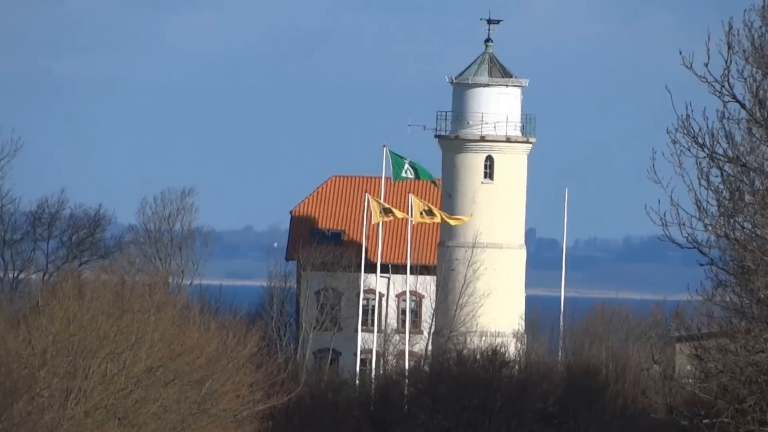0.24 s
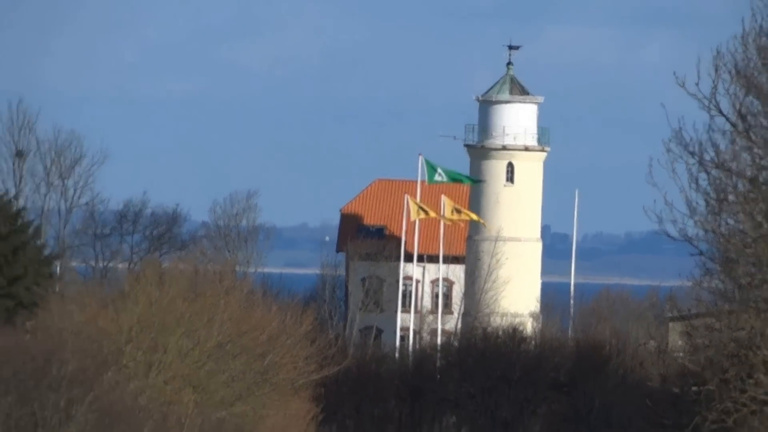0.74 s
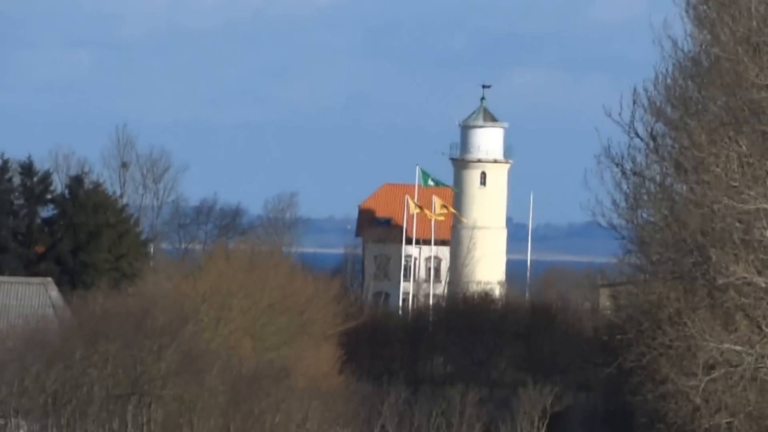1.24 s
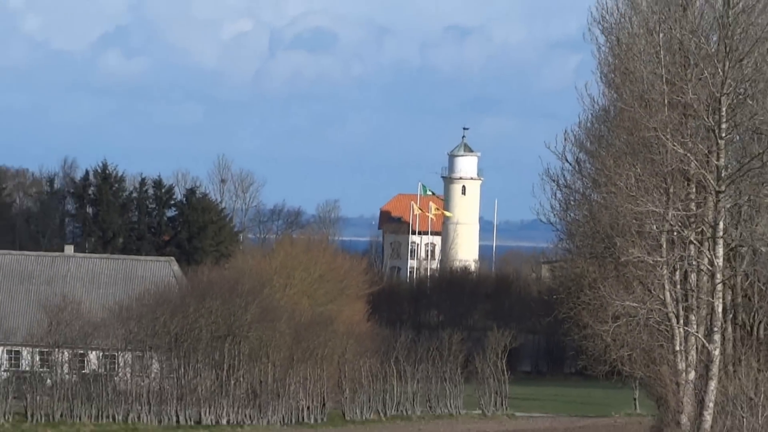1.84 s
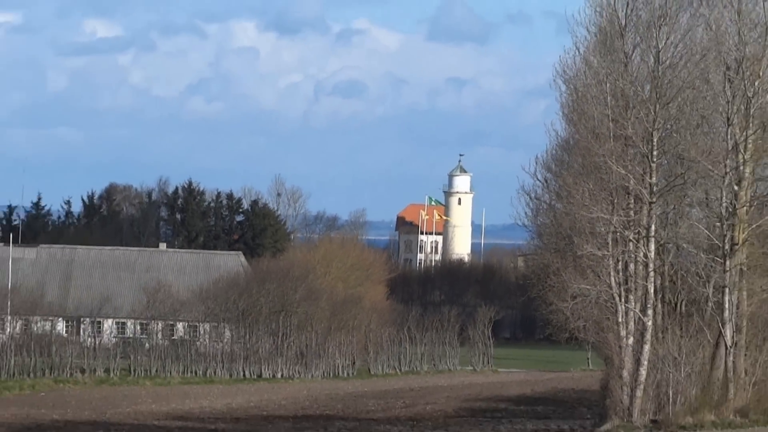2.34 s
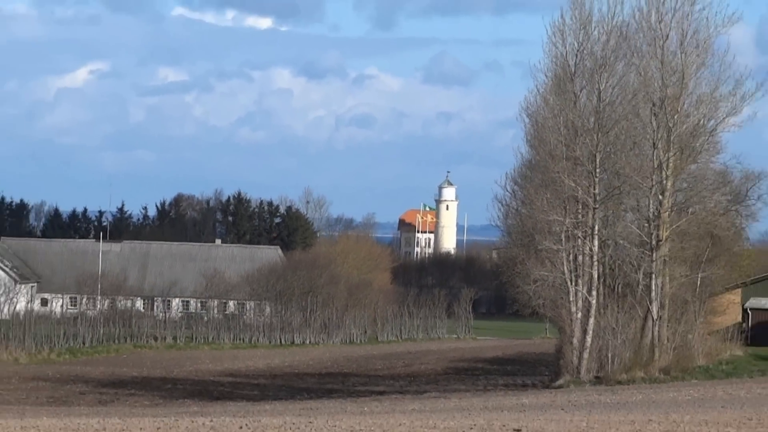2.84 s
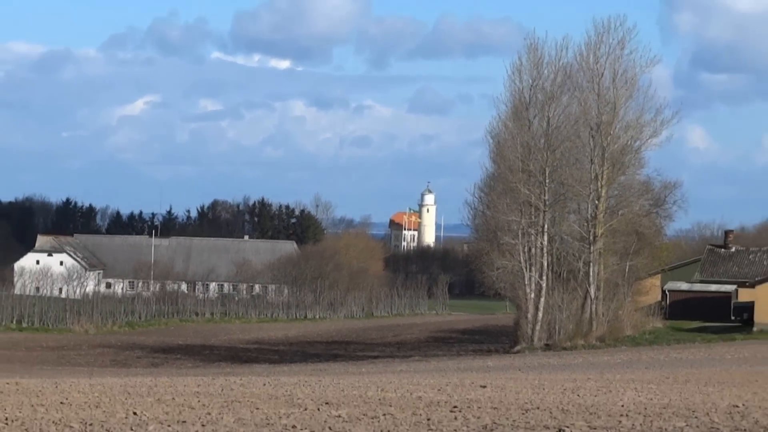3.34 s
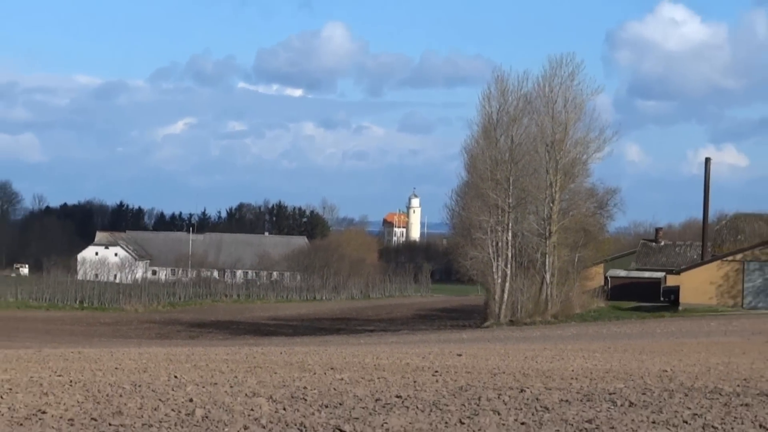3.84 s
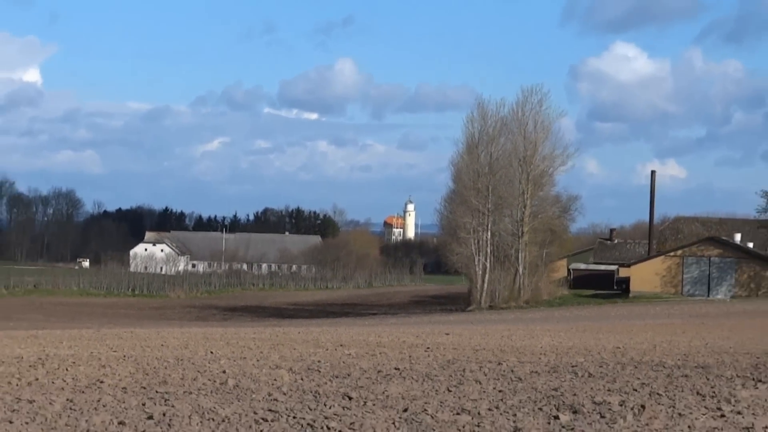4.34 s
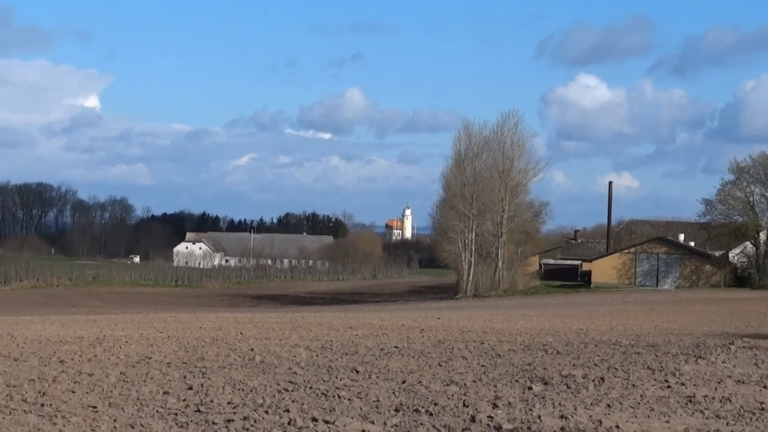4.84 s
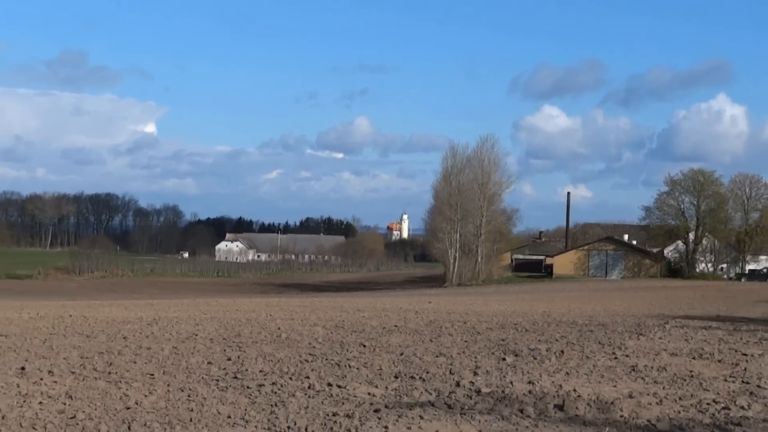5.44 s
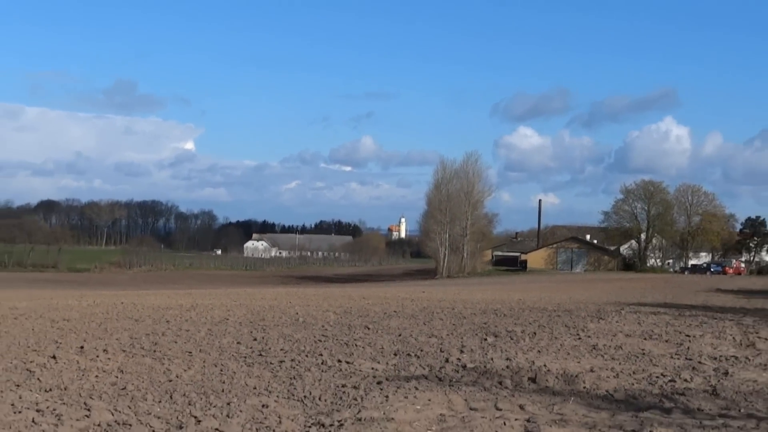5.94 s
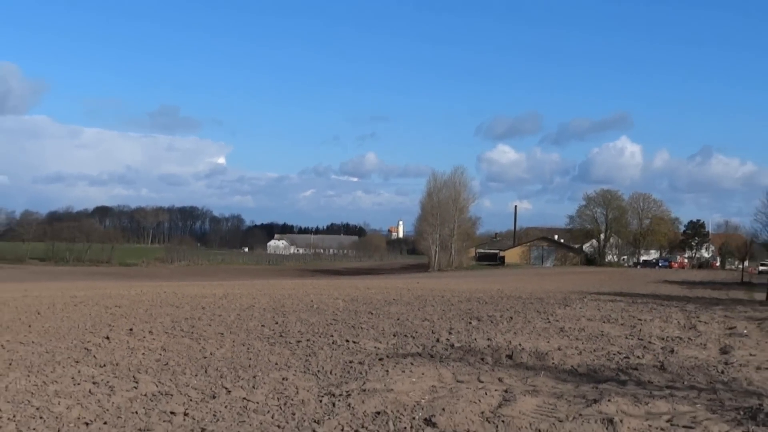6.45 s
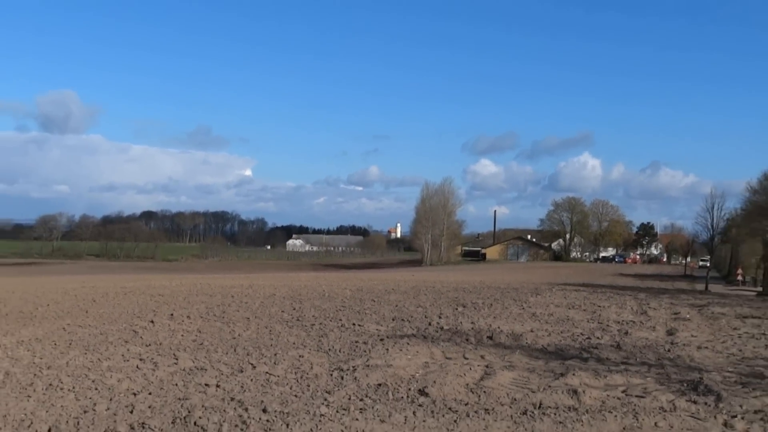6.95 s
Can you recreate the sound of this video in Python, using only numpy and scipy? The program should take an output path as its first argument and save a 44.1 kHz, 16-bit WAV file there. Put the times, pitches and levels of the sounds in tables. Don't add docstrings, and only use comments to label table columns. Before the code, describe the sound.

A small camera zoom motor clicks on and whirs steadily with a buzzy rattle, swelling then easing, while gusty wind rumbles and thumps the microphone.

```python
import sys
import numpy as np
from scipy import signal
from scipy.fft import rfft, irfft, next_fast_len
from scipy.io import wavfile
from scipy.ndimage import map_coordinates

SR = 44100
rng = np.random.default_rng(int(sys.argv[2]) if len(sys.argv) > 2 else 0)


def log_audio(samples):
    frames = np.atleast_2d(samples).T
    limited = np.clip(frames, -1, 1)
    pcm = np.round(limited * 32767).astype(np.int16)
    wavfile.write(sys.argv[1], SR, pcm)


def level_to_linear(level):
    exponent = np.asarray(level, float) / 20
    return 10 ** exponent


N = 317520
T = np.arange(N) / SR

# start_s (middle of the thump), peak_db, pitch_hz, length_cycles
EDDIES = [(0.017, -9, 215, 0.72), (0.031, -11, 181, 1.2), (0.106, -11, 151, 0.69), (0.14, -12.5, 181, 1.05),
          (0.161, -13, 182, .87), (0.314, -17, 136, 2.4), (0.388, -17, 167, .88), (0.448, -14, 186, 0.93),
          (0.509, -14, 146, 1.3), (0.582, -13.5, 203, 0.89), (1.044, -16, 138, 1), (1.059, -9.5, 179, 0.73),
          (1.154, -14.5, 168, 1.35), (1.404, -12, 190, 1.3), (1.778, -15, 165, .8),
          (1.789, -15, 67.4, 0.68), (1.916, -24, 93.5, 1.6), (1.969, -9.5, 144, 0.89),
          (1.988, -13.5, 118, 1.1), (3.307, -15, 111, 0.94), (3.383, -16, 164, 1), (5.042, -19, 101, 1.2),
          (5.355, -5.5, 150, 0.48), (5.407, -8, 168, 0.87), (5.649, -13, 156, 1.1), (6.556, -12, 98, 0.87),
          (6.629, -19, 102, 1.4), (6.733, -5.5, 94, 0.68), (6.792, -12, 151, 1.05),
          (6.927, -14.5, 143, 1.5)]


def unit(x):
    return x / np.sqrt(np.mean(x ** 2) + 1e-20)


def along(points, hz):
    f, v = np.transpose(points)
    return np.interp(np.log(hz + 1), np.log(f + 1), v)


def curves(rows):
    s, *columns = np.transpose(rows)
    return [np.interp(T, s, column) for column in columns]


def wobble(rate):
    points = rng.standard_normal(int(N * rate / SR) + 4)
    return map_coordinates(points, [T * rate])


def filtered(x, response):
    m = next_fast_len(N + SR // 4)
    hz = np.fft.rfftfreq(m, 1 / SR)
    return irfft(rfft(x, m) * response(hz), m)[..., :N]


def hiss():
    # pitch_hz, level_db (per Hz)
    hiss_colour = [(2000, -25), (5000, 6.5), (9000, -2), (12000, -6.5), (13500, -4), (14500, -4),
                   (15100, -7)]
    noise = rng.standard_normal((2, N))
    return level_to_linear(-54) * unit(filtered(noise, lambda hz: level_to_linear(along(hiss_colour, hz))))


def gusts():
    # time_s, strength_db
    wind_swell = [(0.0, -21.5), (0.36, -22), (0.8, -28), (1.2, -26), (2.61, -26.5), (2.93, -33),
                  (3.47, -26.5), (3.89, -30), (4.31, -34), (5.17, -33), (5.47, -27.5), (5.73, -32),
                  (6.24, -31), (6.72, -27.5), (7.04, -33), (7.2, -32)]
    stir_db, stir_s = -13.5, 0.017
    power = level_to_linear(curves(wind_swell)[0]) ** 2
    for s, db, *_ in EDDIES:
        first = max(0, round((s - 4 * stir_s) * SR))
        near = slice(first, round((s + 4 * stir_s) * SR))
        power[near] += level_to_linear(db + stir_db) ** 2 * np.exp(-((T[near] - s) / stir_s) ** 2)
    return 10 * np.log10(power)


def wind():
    # pitch_hz, level_db (per Hz)
    rumble_colour = [(12, -41), (20, -13.5), (59, -0.5), (86, 1), (167, -3), (320, -16), (420, -27.5),
                     (700, -120)]
    # pitch_hz, level_db (per Hz)
    flutter_colour = [(150, -30), (230, -1), (300, -3), (420, -3), (600, -14), (1200, -22.5), (3000, -66)]
    calm_db, rumble_db = -29, 1.5
    sway_hz, sway_db, sway_grows = 74.6, 1.5, 0.31
    flutter_db, flutter_grows, breeze_db = -40, 0.95, -46.5

    gust_db = gusts() - calm_db
    lumps = level_to_linear(0.95 * wobble(22))
    rumble_noise = filtered(rng.standard_normal((2, N)), lambda hz: level_to_linear(along(rumble_colour, hz)))
    rumble = unit(lumps * rumble_noise)
    sway = filtered(rumble, lambda hz: 1 / (1 + (hz / sway_hz) ** 4))
    flutter_noise = filtered(rng.standard_normal((2, N)), lambda hz: level_to_linear(along(flutter_colour, hz)))
    flutter = unit(lumps * level_to_linear(1.65 * wobble(40)) * flutter_noise)

    low = level_to_linear(gust_db) * (rumble - sway) + level_to_linear(sway_db + sway_grows * gust_db) * sway
    flutter_gain = np.hypot(level_to_linear(flutter_db + flutter_grows * gust_db), level_to_linear(breeze_db))
    return level_to_linear(calm_db + rumble_db) * low + flutter_gain * flutter


def eddies():
    lean_db, lean_scatter_db = 0.3, 2
    out = np.zeros((2, N))
    for s, db, hz, cycles in EDDIES:
        early, lean = rng.standard_normal(2)
        near = slice(max(0, round((s - 0.03) * SR)), round((s + 0.028) * SR))
        lead_s = 0.00059 * early * np.array([[1], [-1]])
        u = (T[near] - s + lead_s) * hz
        pan_db = lean_db + lean_scatter_db * lean
        peak = level_to_linear([[db + pan_db / 2], [db - pan_db / 2]])
        out[:, near] -= peak * np.exp(-(u / cycles) ** 2) * np.cos(2 * np.pi * u)
    return out


def clutch():
    # start_s, level_db, pitch_hz, fade_s (time to fall 60 dB)
    clutch_clicks = [
        (.008, -27, 4480, 0.033),
        (.009, -28.5, 3860, .02),
        (.012, -33, 5320, 0.039),
    ]
    out = np.zeros(N)
    for s, db, hz, fade_s in clutch_clicks:
        t = np.clip(T - s, 0, None)
        tone = np.sin(2 * np.pi * hz * t) * (1 - np.exp(-t / 0.00074))
        out += level_to_linear(db - 60 * t / fade_s) * tone * (1 + 0.89 * wobble(1450))
    return np.array([out, 0.2 * out])


def contacts(pattern, width, scatter_db, share, jitter, knock_db):
    # time_s, ahead_turns
    shaft_drift = [(0.0, -0.043), (0.3, -0.408), (0.9, -0.565), (1.5, -1.07), (2.1, -0.998), (2.7, -1.131),
                   (3.0, -1.403), (3.3, -1.426), (3.6, -1.377), (4.2, -1.064), (4.5, -1.009), (5.4, -0.709),
                   (5.7, -0.745), (6.0, -0.615), (6.9, -0.695), (7.2, -0.662)]
    shaft_hz = 30
    angle = np.maximum.accumulate(shaft_hz * T + curves(shaft_drift)[0])
    turns = np.arange(-1, int(angle[-1]))
    power, knocks = np.zeros(N), np.zeros(N)
    for at, db in pattern:
        chance = rng.standard_normal((len(turns) + 4, 2))
        size = level_to_linear(db + scatter_db * chance[:, 0])
        nearest = np.round(angle - at)
        distance = (angle - at - nearest) / max(width, 0.003)
        power += size[nearest.astype(int) + 1] ** 2 * np.exp(-0.5 * distance ** 2)
        knock_turns = turns + at + jitter * chance[:len(turns), 1]
        when = np.interp(knock_turns, angle, np.arange(N), left=N - 1)
        knocks[when.astype(int)] += size[:len(turns)]
    share = np.clip(share, 0, 1)
    scrape = np.sqrt(1 - share + share * power / power.mean()) * rng.standard_normal((2, N))
    return scrape + np.sqrt(share) * level_to_linear(knock_db) * unit(knocks) * [[1], [0]]


def barrel(drive, modes, restless_db, rate):
    lens_times = [0.498, 1.22, 1.3, 3.3, 4.998, 6.4]
    out, power = 0, 0
    for (hz, width, polarity), levels in modes:
        gain = level_to_linear(np.interp(T, lens_times, levels))
        ring = signal.lfilter(*signal.iirpeak(hz, hz / width, SR), drive)
        unrest = level_to_linear(restless_db * min(1, 250 / width) * wobble(rate))
        out = out + np.sign(polarity) * gain * unrest * ring
        power = power + gain ** 2 * width
    return unit(out / np.sqrt(power))


def motor():
    # time_s, load_db, mesh_db (over the load)
    motor_effort = [(0.0, -36.5, -8), (0.25, -37, -6), (0.6, -34.5, -8), (1.0, -33.5, -6), (1.25, -31, -8),
                    (1.8, -30.5, -8), (2.3, -29, -8), (2.7, -28, -9), (3.0, -26, -7), (3.5, -25.5, -9),
                    (4.2, -29.5, -7), (4.55, -29, -7), (5.0, -29.5, -6.5), (5.7, -30.5, -8), (6.3, -31, -9),
                    (6.58, -30.5, -5), (6.85, -29.5, -10), (7.2, -30, -5.5)]
    # angle_turns, size_db
    pole_angles = [(.07, 0), (.235, 0), (.4, 0), (.57, .5), (.735, -.5), (.9, 0)]
    # angle_turns, size_db
    tooth_angles = [(.055, -3), (.22, -11), (.39, 0), (.55, -10), (.72, -5), (.89, -10)]
    # angle_turns, size_db
    brush_angles = [(.43, 0), (.5, -1), (.95, -1), (.02, -2)]
    # (pitch_hz, width_hz, polarity), level_db at each of six lens positions
    low_rings = [((633.6, 66.5, 1), (-5, -8, -8, -6.5, -7.5, -3)), ((951.5, 90, -1),
                 (-7, -4.5, -5.5, -4, -8, -4.5)), ((1228, 76, 1), (-10.5, -8, -10.5, -7.5, -7.5, -2.5)),
                 ((1392, 66.5, 1), (0, 0, 0, 0, 0, 0)), ((1484.6, 77.5, -1), (-0.5, -3, -3.2, 2, -0.8, 2)),
                 ((1622, 106, -1), (-6, -6, -5.5, -15, -8, -2)), ((1873, 520, 1),
                 (-16, -15, -17, -17.5, -19.5, -23))]
    # (pitch_hz, width_hz, polarity), level_db at each of six lens positions
    middle_rings = [((2380, 300, 1), (-7, -14, -8.5, -13.5, -9.5, -9.5)), ((2770, 104, -1),
                    (-3.5, -5.5, -4.5, -7.5, -2, -3)), ((3266, 300, 1), (-4.5, -3.5, -4.5, -0.5, -2.5, -2)),
                    ((3725, 257, -1), (0, 0, 0, -1, 0, 0)), ((4045, 145, 1),
                    (-8, -20, -3, -10.5, -3, -13.5)), ((4438, 300, 1), (-8, -13, -3.5, -10.5, -9, -8.5))]
    # (pitch_hz, width_hz, polarity), level_db at each of six lens positions
    high_rings = [((5220, 100, 1), (-1, -4, 0, 2, -9, 0)), ((5750, 240, -1), (-10, -14, -6, -6, -10, -12)),
                  ((6550, 520, -1), (-29, -14, -13, -12, -9, -5)), ((7160, 136, -1),
                  (-0.5, -10, 1, -1.5, -7, -6.5)), ((8030, 180, 1), (0.22, -0.47, -2, -0.7, 1, 0)),
                  ((8580, 200, -1), (-20, -15, -7, -6, -4, -3)), ((9230, 210, 1),
                  (-11, -9, -4, -1.5, -3, -6.5)), ((11600, 5300, -1), (-21, -21, -15.5, -16.5, -21, -15.5))]
    mean_load_db, hum_db, pole_knock_db = -31, -31.5, 4.5
    fizz_db, fizz_grows, rattle_db = -49.5, 0.18, 1.11

    load_db, mesh_db = curves(motor_effort)
    effort_db = load_db - mean_load_db
    cogging = np.clip(0.33 - 0.025 * effort_db, 0, 1)
    start_db = -4 * np.exp(-T / 0.041)

    poles = contacts(pole_angles, width=0.15, scatter_db=-1.0, share=cogging, jitter=0.0086,
                     knock_db=pole_knock_db)
    poles = poles / np.sqrt(1 + cogging * level_to_linear(pole_knock_db) ** 2 / 2)
    teeth = contacts(tooth_angles, width=0.032, scatter_db=1.3, share=0.56, jitter=0.004, knock_db=-5)
    brushes = contacts(brush_angles, width=0.016, scatter_db=3.0, share=0.55, jitter=0.015, knock_db=-5)

    hum = filtered(barrel(poles, low_rings, 0.17, rate=3.5),
                   lambda f: 1 / (1 + (520 / (f + 1)) ** 6 + (f / 2400) ** 6))
    rattle = filtered(barrel(teeth, middle_rings, 0.95, rate=7),
                      lambda f: 1 / (1 + (2300 / (f + 1)) ** 6 + (f / 5200) ** 8))
    fizz = filtered(barrel(brushes, high_rings, 1.9, rate=28),
                    lambda f: 1 / (1 + (4800 / (f + 1)) ** 8))
    whir = level_to_linear(hum_db + effort_db) * hum
    whir = whir + level_to_linear(fizz_db + fizz_grows * effort_db) * fizz
    whir = whir + level_to_linear(rattle_db + load_db + mesh_db) * rattle
    return level_to_linear(start_db) * whir


def ports(pair):
    # pitch_hz, likeness (0-1)
    likeness = [(60, 0.99), (140, 0.89), (250, 0.67), (520, 0.4), (620, 0.85), (950, 1), (1450, 0.9),
                (2150, 1), (3300, 1), (4300, 0.86), (5200, 0.17), (6100, 0.31), (8000, 0.8), (9700, 0.82)]
    # pitch_hz, lead_radians
    left_lead = [(100, -0.063), (300, -0.49), (700, -0.43), (900, 1.14), (1300, 0.53), (1800, 1.14),
                 (3000, 0.85), (4500, 0.88), (5300, 0.84), (6000, -1.1), (7600, 0.64), (9700, -0.48)]
    # pitch_hz, difference_db
    left_tilt = [(100, 0.5), (300, 1), (700, 0.5), (850, 9), (1130, -11.5), (1290, 19.5), (1400, -3.5),
                 (1580, 4), (1800, -0.5), (2200, 0.5), (3200, 1), (4300, 4.5), (5500, -1.5), (9700, -0.5)]

    def blend(hz):
        angle = np.arccos(np.clip(along(likeness, hz), -1, 1)) / 2
        return np.array([np.cos(angle), np.sin(angle)])

    def balance(hz):
        half = level_to_linear(along(left_tilt, hz) / 2) * np.exp(0.5j * along(left_lead, hz))
        return np.array([half, 1 / half])

    mid, side = filtered(pair, blend)
    return filtered(np.array([mid + side, mid - side]), balance)


def scene():
    return ports(motor() + clutch() + wind() + hiss()) + eddies()


def low_pass(x):
    return signal.sosfilt(signal.butter(12, 15560, fs=SR, output="sos"), x)


def record(dry):
    mid = filtered(dry[0] + dry[1], lambda hz: hz < 15140) / 2
    side = filtered(dry[0] - dry[1], lambda hz: hz < 9560) / 2
    return low_pass(np.array([mid + side, mid - side]))


dry = scene()
out = record(dry)
log_audio(out)
```